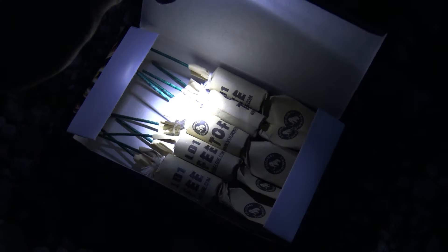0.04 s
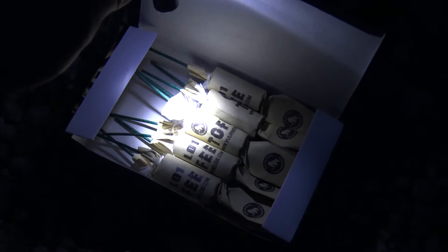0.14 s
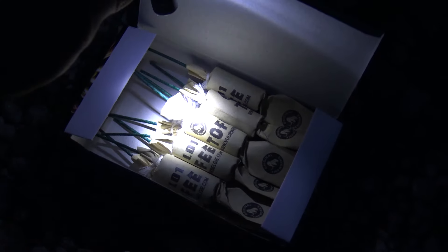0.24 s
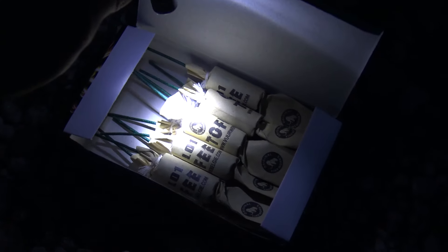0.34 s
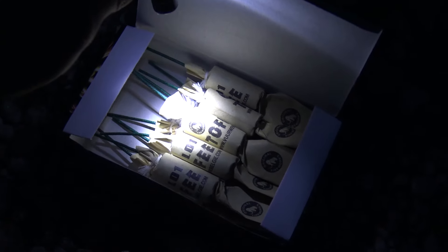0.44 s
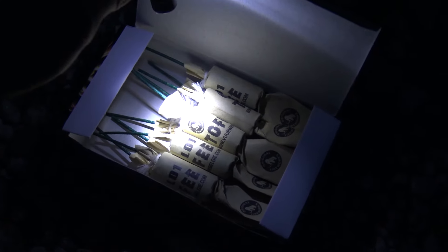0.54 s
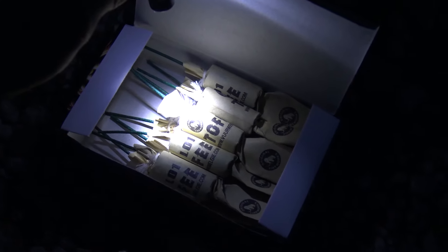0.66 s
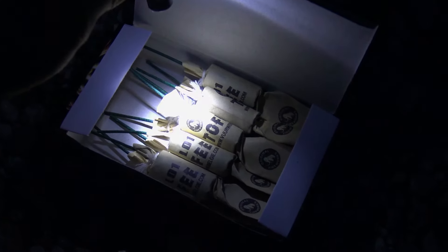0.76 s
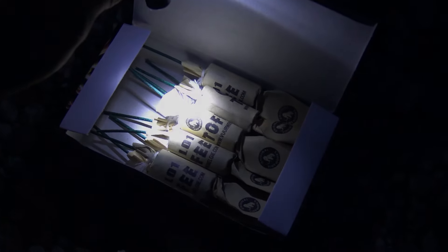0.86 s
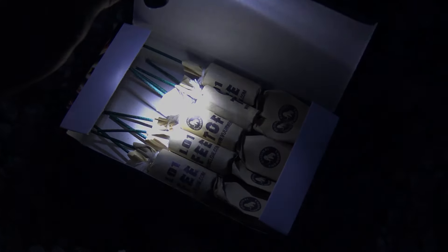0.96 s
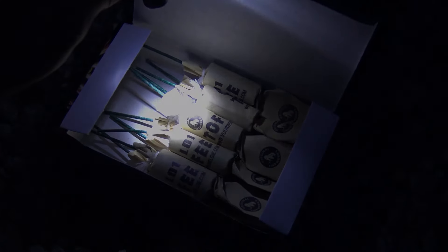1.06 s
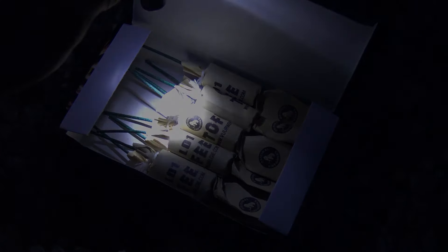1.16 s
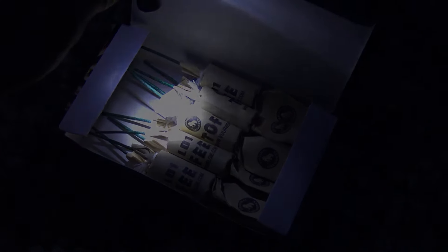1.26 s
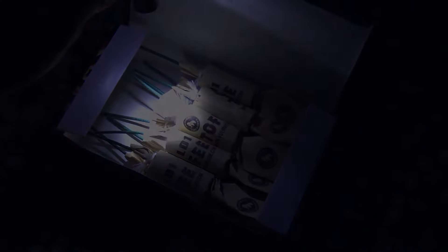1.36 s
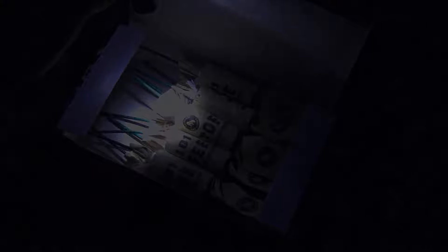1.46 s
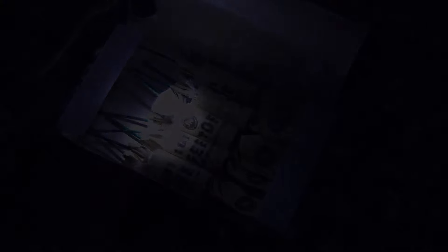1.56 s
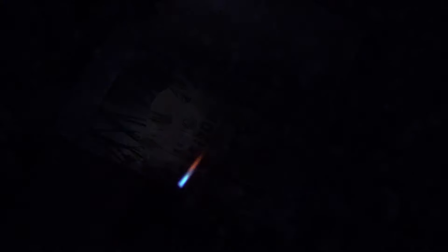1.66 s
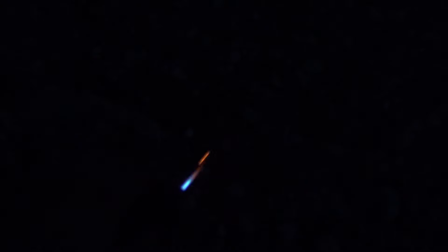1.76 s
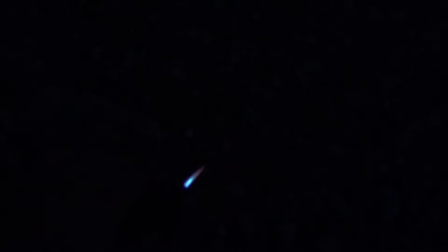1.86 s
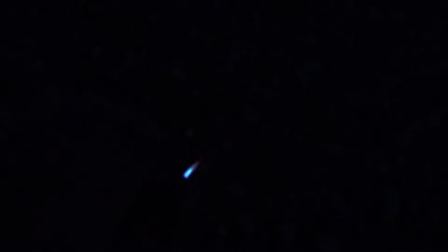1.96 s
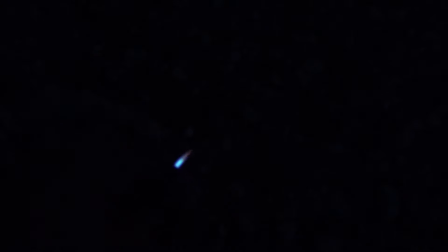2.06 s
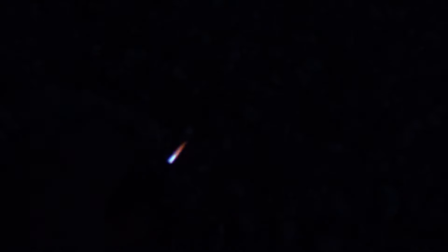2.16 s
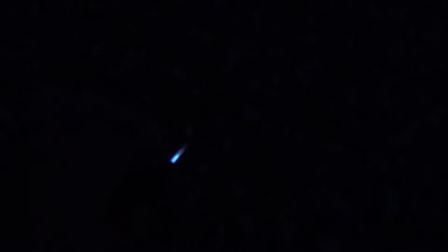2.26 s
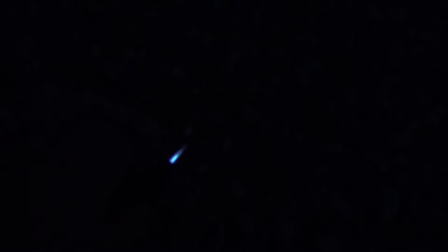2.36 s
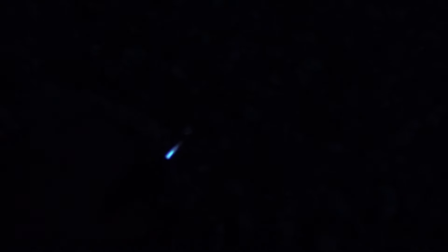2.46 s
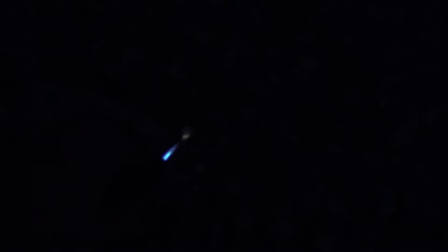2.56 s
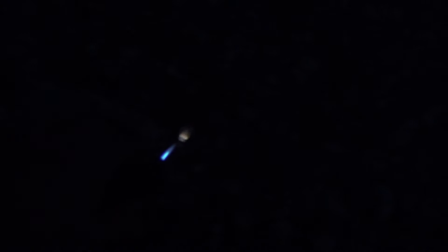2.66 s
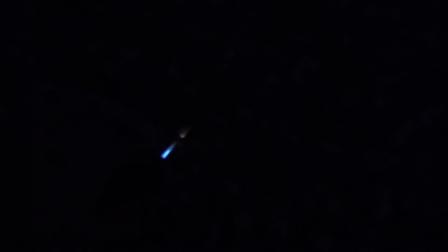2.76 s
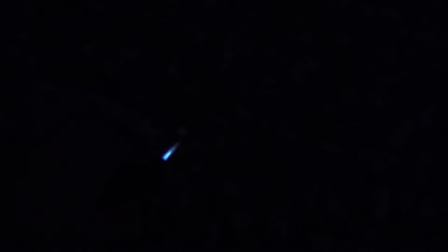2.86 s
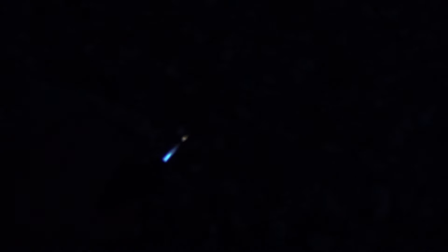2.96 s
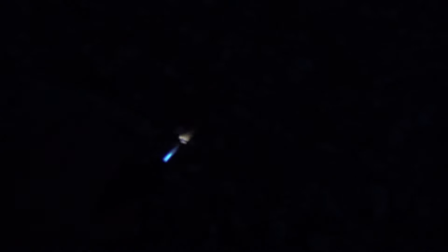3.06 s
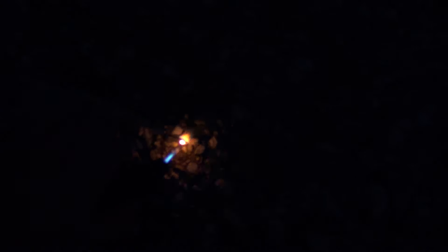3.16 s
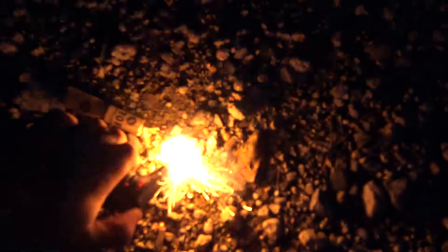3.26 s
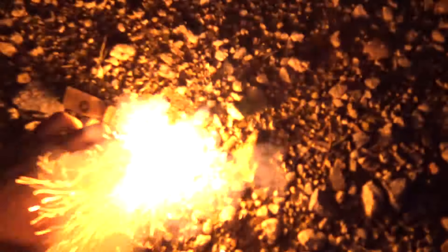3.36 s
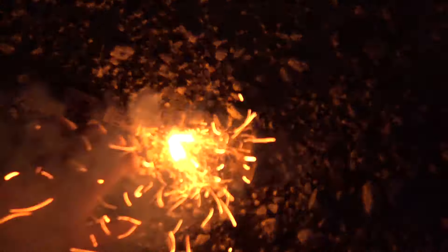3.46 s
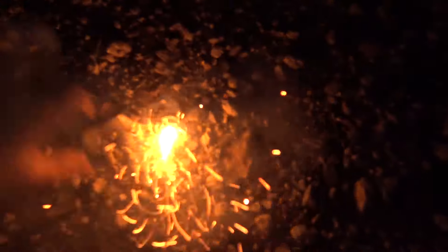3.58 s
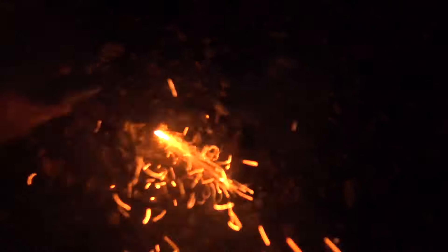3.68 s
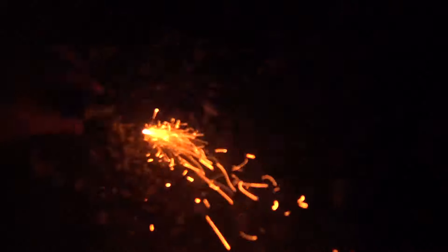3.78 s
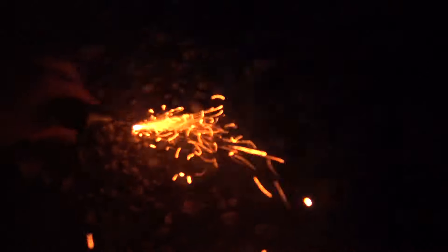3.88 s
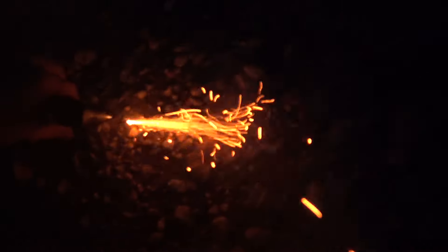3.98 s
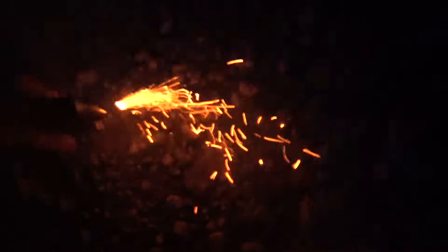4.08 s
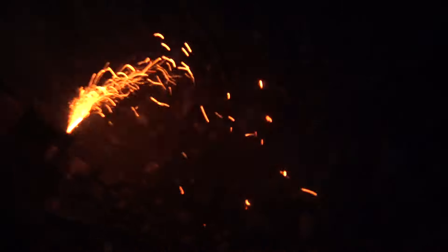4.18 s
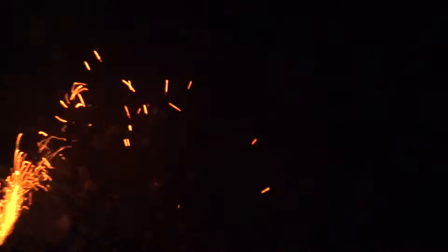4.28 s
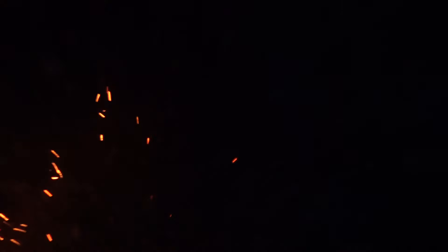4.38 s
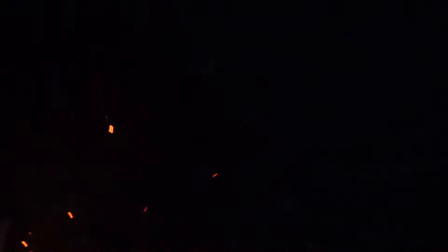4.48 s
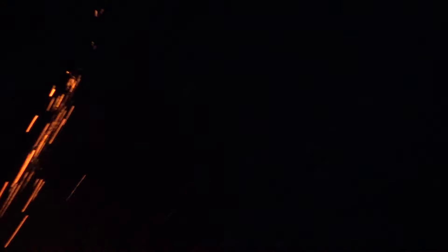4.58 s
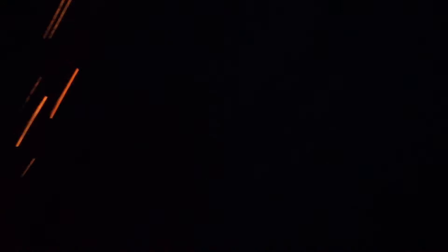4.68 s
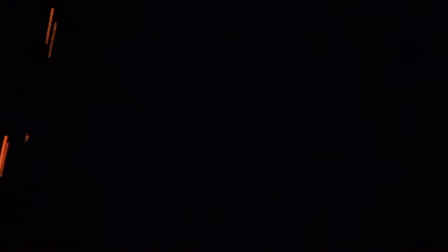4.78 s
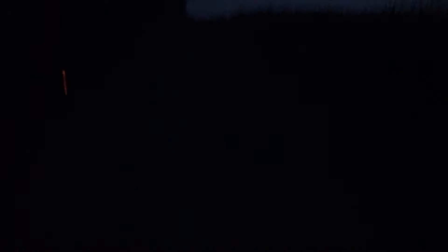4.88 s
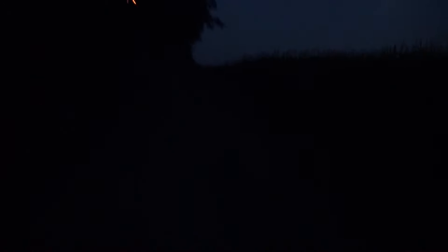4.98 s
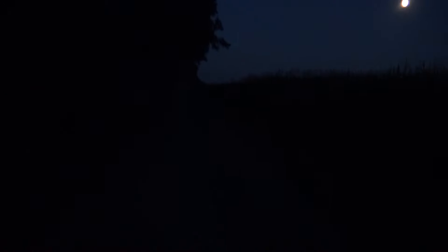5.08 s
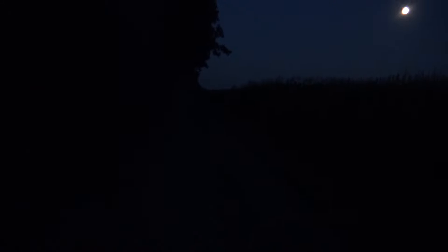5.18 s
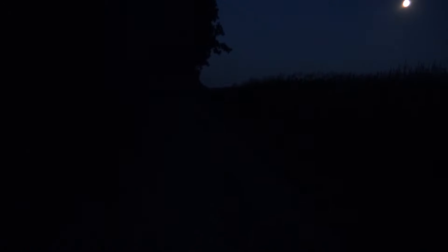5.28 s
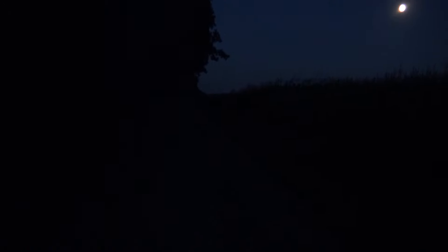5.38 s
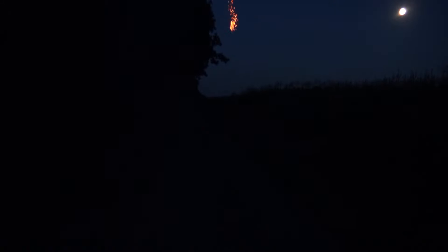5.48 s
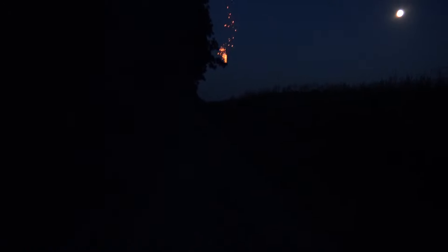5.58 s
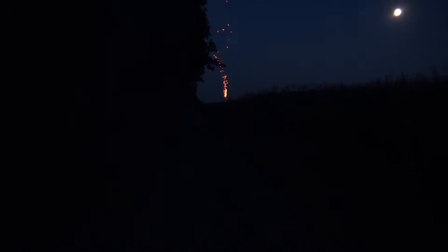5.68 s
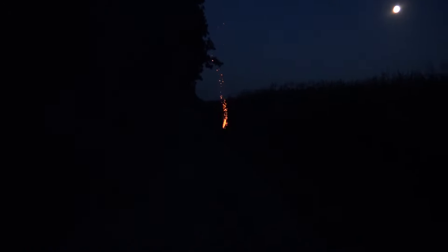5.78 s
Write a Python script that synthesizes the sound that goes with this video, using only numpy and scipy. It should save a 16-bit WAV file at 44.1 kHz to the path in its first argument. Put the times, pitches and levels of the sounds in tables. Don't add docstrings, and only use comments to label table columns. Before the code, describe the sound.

Cricket chirps and a passing far car, small plastic ticks, a sharp igniter click, soft flame, then a fierce powder hiss swept off into the distance.

```python
import sys
import numpy as np
from scipy import signal
from scipy.fft import rfft, irfft, next_fast_len
from scipy.io import wavfile
from scipy.ndimage import uniform_filter1d, map_coordinates

SR = 44100
rng = np.random.default_rng(int(sys.argv[2]) if len(sys.argv) > 2 else 0)


def voltage_ratio(decibels):
    exponent = np.asarray(decibels, float) / 20
    return 10 ** exponent


def master_out(mix):
    frames = np.transpose(np.atleast_2d(mix))
    ceiling = np.clip(frames, -1, 1)
    pcm = np.round(ceiling * 32767).astype(np.int16)
    wavfile.write(sys.argv[1], SR, pcm)


N = 257539
SIZE = next_fast_len(N)
HZ = np.maximum(np.arange(SIZE // 2 + 1) * SR / SIZE, 1)
TIME = np.arange(N) / SR

# pitch_hz, density_db (per Hz)
FIELD_TONE = [(47, -28), (80, -9), (245, 0.5), (480, -8.5), (570, -10.5), (1150, -5.5), (2700, -27),
              (6200, -39), (9400, -35.5), (17000, -37.5)]
# peak_s, level_db, fade_s
PORT_PUFFS = [
    (.85, -54.5, 0.43),
    (3.4, -52, 0.046),
    (4.0, -58, 0.22),
    (4.59, -33.5, 0.068),
    (4.7, -33, 0.048),
    (5.14, -44, 0.086),
    (5.25, -46, 0.061),
]
# start_s, level_db
CRICKET_CHIRPS = [(0.0248, -43), (0.1544, -44), (0.294, -42.5), (0.434, -42), (0.567, -41.5),
                  (0.7084, -42.5), (0.8424, -44.5), (0.9874, -45.5), (1.145, -48), (1.28, -53),
                  (1.3754, -47), (1.5084, -45), (1.9114, -43.5), (2.0472, -43.5), (2.1814, -42.5),
                  (2.3784, -44), (2.5124, -43.5), (2.6514, -45), (2.7954, -43.5), (2.9347, -44),
                  (3.0754, -43.5), (3.2196, -40.5)]
# pitch_hz, width_hz, level_db
WING_RINGS = [(9270, 610, 3), (9440, 2060, 5), (11500, 2900, -14)]
# time_s, level_db
WING_STROKES = [(0, -28), (.003, -4.5), (.022, -6.5), (.032, -9), (.05, -3), (.075, -8.5), (.1, -12.5),
                (.13, -38)]
# start_s, dull_db, bright_db, bright_hz
HAND_TICKS = [(1.1385, -44, -59, 3100), (1.1427, -36, -53, 3720), (1.1934, -57, -64, 4380),
              (1.272, -43, -50.5, 5000), (1.332, -52, -62, 5370), (1.4015, -37, -49.5, 2700),
              (1.5359, -44, -52, 3090), (1.5444, -55, -56, 3730), (1.5516, -40, -66, 3250),
              (1.6165, -50, -56, 6800), (1.9335, -53, -50, 3360)]
# start_s, dull_db, bright_db, bright_hz
POWDER_SNAPS = [
    (3.5425, -16.5, -17, 7200),
    (5.4417, -28.5, -16.5, 7430),
    (5.5278, -50, -37, 7390),
]
# start_s, level_db, pitch_hz
FOOT_STONES = [(5.071, -36, 1130), (5.078, -33.5, 982), (5.141, -33, 1640), (5.202, -34, 1614),
               (5.211, -37.5, 1560), (5.313, -34, 584), (5.324, -58, 544), (5.345, -38, 762),
               (5.361, -36, 540), (5.567, -42, 1460), (5.656, -34, 1180), (5.663, -38.5, 306),
               (5.69, -35, 1310), (5.697, -35, 1160), (5.728, -36, 647), (5.736, -43.5, 668),
               (5.784, -33, 1200), (5.795, -26.5, 1450), (5.8, -27, 1180), (5.813, -30, 850),
               (5.824, -34, 1300)]
# start_s, level_db, pitch_hz
STONE_CLACKS = [
    (4.7728, -15.5, 1360),
    (5.157, -21, 1360),
]
# lag_ms, left_gain, right_gain
NEAR_ECHOES = [(.39, 0.0053, -0.0096), (0.481, 0.14, 0.13), (.62, -0.047, -0.041), (.74, 0.019, 0.083),
               (1.15, .03, .14), (1.5, -0.028, -0.093), (1.92, 0.03, 0.014)]
# pitch_hz, density_db (per Hz)
FLAME_TONE = [(150, -26), (250, -2), (516, 0), (660, 4.5), (860, 0.5), (1200, 6), (1700, -2.5),
              (2300, -14.5), (4000, -17)]
# pitch_hz, density_db (per Hz)
JET_TONE = [(1200, -27), (2200, 11), (3600, 10), (5200, 4), (6800, 4.5), (10000, 3.5), (12300, 4.5),
            (14200, -1), (16000, 1), (17000, -2)]
# pitch_hz, level_db, t60_s
IGNITER_RINGS = [(2210, -7, 0.0081), (3520, -7.5, 0.06), (4160, -12, 0.02), (5830, 3, 0.0097),
                 (6800, 4, 0.012), (7680, -8, 0.045), (8170, 1.5, 0.012), (9550, -4.5, 0.032),
                 (10000, -4, 0.04), (10500, -3, 0.02), (11000, -7, 0.016), (11930, -4, 0.013)]
# time_s, echo_lag_ms
TORCH_DROP = [
    (1.9, 0.25),
    (2.1, 0.22),
    (2.33, .2),
    (2.45, .155),
]
# pitch_hz, density_db (per Hz)
FUSE_TONE = [(60, -17), (200, -6), (700, 0), (1200, 6), (1700, 0), (2200, 0.5), (4000, 0.5), (7000, 4),
             (10000, 5), (13000, 1.5), (16500, -4.5)]
# time_s, burn_db, aim (of its gas jet at the camera, 0-1)
FUSE_LYING = [
    (3.215, -63, 0.23),
    (3.32, -33, .28),
    (3.42, -31, 0.05),
    (3.574, -35, 0.14),
    (3.645, -29, 0.23),
    (3.71, -32, .2),
    (3.79, -27, 0.76),
    (3.92, -22, 0.91),
    (4.03, -27.5, 0.67),
]
# time_s, burn_db, aim (0-1)
FUSE_FLUNG = [
    (4.14, -23.5, 1),
    (4.316, -33, 0.67),
    (4.446, -32, .8),
    (4.55, -38, 0.78),
    (4.69, -29.5, 0.81),
    (4.77, -36, 0.76),
    (4.92, -35, 0.92),
    (5.04, -41, 0.76),
    (5.14, -39.5, 0.81),
]
# time_s, echo_lag_ms
FUSE_SWING = [
    (3.9, .114),
    (3.99, .078),
    (4.06, .088),
    (4.11, .2),
    (4.19, .44),
    (4.31, .615),
    (4.375, .65),
    (4.5, 1.1),
    (4.66, 2.8),
]

BREEZE_DB, BREEZE_WANDER_DB, FIELD_PAN_DB = -58.5, 1, 2.2
CAR_S, CAR_NEARS_DB_S, CAR_LEAVES_DB_S = 0.91, 1.5, 16.5
CAR_AIR_DB, CAR_RUMBLE_DB, DRONE_AIR_DB, DRONE_RUMBLE_DB = -50, -45, -56, -67
TICK_HZ, TICK_PAN_DB, SNAP_HZ, SNAP_PAN_DB = 1640, 3, 2500, 2
STONE_T60_S, CLACK_T60_S = 0.017, .004
VALVE_S, LEAK_DB, FLARE_DB, FLARE_S = 1.615, -53, -35.5, 0.037
IGNITER_S, IGNITER_DB = 1.6717, -6.5
FLAME_DB, FLAME_RISE_S, TORCH_AWAY_S, TORCH_AWAY_DB_S = -47.5, 0.04, 3.24, 60
JET_DB, BURST_DB, BURST_S, SETTLE_DB, SETTLE_S = -56.5, -43, 0.033, -57.5, 0.21
THROWN_FROM_M, UP_M_S, AWAY_M_S, HAND_M, CAMERA_M = 2.14, 7.1, 4.3, .69, 1.5
ROAR_DB, FIZZ_DB, SIZZLE_DB = (7.5, -14.5), (3, -11.5), (-16.5, -4.5)
FIZZ_LIFTED_DB, SIZZLE_LIFTED_DB, TUMBLE_DB = 5, -3, .9
ECHO_SHARE, ECHO_HALF_MS, ECHO_FAR, ECHO_LYING = 0.56, 3.3, 0.13, 0.52
STONE_ECHO_MS, STONE_ECHO_WANDER, STONE_ECHO_SHARE = .42, .15, .17
FUSE_PAN_DB, SWING_PAN_DB, SWING_S, SWING_WIDE_S = 2.5, 3, 4.49, 0.22
SELF_NOISE_DB = -71
SPLITS_HZ, TOP_HZ = (9200, 11200, 13600, 21000), 16650


def level(x, db):
    return x * voltage_ratio(db) / np.sqrt(np.mean(x ** 2))


def curves(rows):
    s, *columns = np.transpose(rows)
    return [np.interp(TIME, s, c) for c in columns]


def shape(x, gain):
    return irfft(rfft(x, SIZE) * gain, SIZE)[..., :N]


def colour(points):
    hz, db = np.transpose(points)
    return voltage_ratio(np.interp(np.log(HZ), np.log(hz), db))


def below(hz, order=2):
    return 1 / (1 + (HZ / hz) ** (2 * order))


def ring(hz, width_hz):
    return 1 / (1 + 1j * (HZ / hz - hz / HZ) * hz / width_hz)


def damped(hz, t60):
    t = TIME[:int(.08 * SR)]
    return np.sin(2 * np.pi * hz * t) * np.exp(-np.log(1000) * t / t60)


def walk(rate):
    k = int(SR / rate)
    held = np.repeat(rng.standard_normal(N // k + 1), k)
    return 1.28 * uniform_filter1d(uniform_filter1d(held, k), k)[:N]


def restless(x, gain, flicker_db, rate, lo_hz, hi_hz):
    bins, out = rfft(x, SIZE) * gain * (below(hi_hz) - below(lo_hz)), 0
    first, last = round(np.log2(lo_hz)), round(np.log2(hi_hz))
    pitch = np.clip(np.log2(HZ), first, last)
    for octave in range(first, last + 1):
        share = np.clip(1 - abs(pitch - octave), 0, 1)
        out = out + voltage_ratio(flicker_db * walk(rate)) * irfft(bins * share, SIZE)[..., :N]
    return level(out, 0)


def add(out, s, x):
    i = int(s * SR)
    out[..., i:i + x.shape[-1]] += x[..., :N - i]


def pan(db):
    return voltage_ratio(np.array([db, -db]) / 2).reshape(2, -1)


def twin(x, wide, hz):
    return x[0] + wide * shape(x[1], 1 - 0.75 * below(hz, order=1)) * np.array([[1], [-1]])


def delay(x, ms):
    return map_coordinates(x, [np.arange(N) - ms * SR / 1000], order=3)


def side(x, db):
    return np.array([x[0], delay(x[1], 0.0072 * db)]) * pan(db)


def bounce(x, lag_ms, share, dull_hz):
    dulled = shape(x, np.sqrt(below(dull_hz, order=1)))
    echo = np.array([delay(c, lag_ms) for c in dulled])
    return (x + share * echo) / np.sqrt(1 + share ** 2)


def nearby(x, share):
    ms, *gains = np.transpose(NEAR_ECHOES)
    turns = np.exp(-2j * np.pi * np.outer(ms / 1000, HZ))
    return x + share * shape(x, np.array(gains) @ turns)


def traffic(car_air, car_rumble):
    noise = rng.standard_normal((4, N))
    air = level(shape(twin(noise[:2], 1.0, 1900), colour(FIELD_TONE) * (1 - below(347))), 0)
    air = air * voltage_ratio(1.2 * walk(7))
    rumble = restless(twin(noise[2:], 1.0, 5000), colour(FIELD_TONE), 1.6, 11, 51, 540)
    hum = voltage_ratio(-13) * np.sin(2 * np.pi * 481 * TIME + 1.5 * walk(9))
    return air * car_air + (rumble + hum) * car_rumble


def wind(port_noise):
    puffs = level(shape(port_noise, ring(36, 40) ** 2), 0) * pan(6.5)
    strength = voltage_ratio(BREEZE_DB + BREEZE_WANDER_DB * walk(6.02))
    for s, db, fade in PORT_PUFFS:
        strength = strength + voltage_ratio(db) * np.exp(-abs(TIME - s) / fade)
    return puffs * strength * voltage_ratio(1.7 * walk(17))


def field():
    car = voltage_ratio(np.where(TIME < CAR_S, CAR_NEARS_DB_S, -CAR_LEAVES_DB_S) * (TIME - CAR_S))
    air_gain = np.hypot(car * voltage_ratio(CAR_AIR_DB), voltage_ratio(DRONE_AIR_DB))
    rumble_gain = np.hypot(car * voltage_ratio(CAR_RUMBLE_DB), voltage_ratio(DRONE_RUMBLE_DB))
    chorus_noise, rustle_noise, port_noise = rng.standard_normal((3, 2, N))
    chorus = level(shape(chorus_noise, ring(9370, 1450) ** 2), -62.5)
    chorus = chorus * np.interp(TIME, [1.6, 1.75, 1.9, 2.4], [1, .3, 0.25, 0.85])
    rustle = level(shape(rustle_noise, ring(5300, 2500) ** 2), -66.0)
    rustle = rustle * np.interp(TIME, [.04, .1, .22, .25], [0, 1, 1, 0])
    deep = level(shape(port_noise[0] + .5 * rustle_noise, ring(71.4, 29.0) ** 2), -9.5) * rumble_gain
    far = (traffic(air_gain, rumble_gain) + chorus) * pan(FIELD_PAN_DB)
    return far + rustle + deep + wind(port_noise)


def cricket():
    effort = np.zeros(N)
    stroke = voltage_ratio(np.interp(TIME[:int(.13 * SR)], *np.transpose(WING_STROKES)))
    for s, db in CRICKET_CHIRPS:
        add(effort, s, voltage_ratio(db) * stroke)
    teeth = (rng.random(N) < 700 / SR) * voltage_ratio(4.0 * rng.standard_normal(N))
    scrape = level(teeth, -9.5) + twin(rng.standard_normal((2, N)), 1.0, 3000)
    wing = sum(voltage_ratio(db) * ring(hz, width) ** 2 for hz, width, db in WING_RINGS)
    wing = wing * (1 - below(8400, order=8))
    return side(level(shape(scrape, wing), -3) * effort, 5.9)


def ticks():
    out = np.zeros((2, N))
    for rows, hz, pan_db in ((HAND_TICKS, TICK_HZ, TICK_PAN_DB), (POWDER_SNAPS, SNAP_HZ, SNAP_PAN_DB)):
        for s, db, edge_db, edge_hz in rows:
            edge = damped(edge_hz, .0025) - .6 * damped(1.55 * edge_hz, .0012)
            edge = edge + .4 * damped(.68 * edge_hz, .003) + .3 * damped(2.1 * edge_hz, .0008)
            tick = (voltage_ratio(db) * damped(hz, 0.011) + voltage_ratio(edge_db + 9.5) * edge) * pan(pan_db)
            add(out, s + 0.001, tick)
            add(out, s + .0019, -.35 * tick)
    return shape(out, ring(1300, 1700) * 1j * HZ / 1700)


def gravel():
    out = np.zeros((2, N))
    for rows, ring_s in ((FOOT_STONES, STONE_T60_S), (STONE_CLACKS, CLACK_T60_S)):
        for s, db, hz in rows:
            t60 = ring_s * (1000 / hz) ** 0.38
            knock = damped(hz, t60) + .5 * damped(1.4 * hz, 1.05 * t60)
            add(out, s + 0.00212, voltage_ratio(db) * knock * pan(3.0))
    return out


def igniter(jet):
    snap = 0
    for k, (hz, db, t60) in enumerate(IGNITER_RINGS):
        snap = snap + (-1) ** k * voltage_ratio(db) * damped(hz, min(t60, .03))
    crack = jet[:, :len(snap)] * np.exp(-(TIME[:len(snap)] / 0.0016) ** 2)
    body = 0.05 * damped(640, 0.0083) + 0.061 * damped(1700, .008)
    return voltage_ratio(IGNITER_DB) * (snap / abs(snap).max() + 0.093 * crack + body)


def torch():
    since = np.maximum(TIME - IGNITER_S, 0)
    lit = (since > 0) * voltage_ratio(-TORCH_AWAY_DB_S * np.maximum(TIME - TORCH_AWAY_S, 0))
    flame_gain = lit * voltage_ratio(FLAME_DB) * np.tanh((since / FLAME_RISE_S) ** 2)
    burst = voltage_ratio(BURST_DB) * np.exp(-since / BURST_S)
    settle = voltage_ratio(SETTLE_DB) * np.exp(-since / SETTLE_S)
    jet_gain = lit * (voltage_ratio(JET_DB) + burst + settle)
    noise = rng.standard_normal((4, N))
    flame = restless(twin(noise[:2], 0.23, 3000), colour(FLAME_TONE), 0.99, 18, 245, 2460)
    jet = level(shape(twin(noise[2:], 0.31, 3000), colour(JET_TONE)), 0)
    grounded_jet = bounce(jet * jet_gain, curves(TORCH_DROP)[0], .48, 11000)
    out = flame * flame_gain + nearby(grounded_jet, np.interp(TIME, [2.35, 2.45], [.6, 2.0]))
    valve = ring(6640, 2100) ** 2 + .7 * ring(9800, 3500) ** 2 + .25 * ring(16000, 2500) ** 2
    leak = voltage_ratio(LEAK_DB) * np.clip((TIME - VALVE_S) / 0.019, 0, 1)
    flare = voltage_ratio(FLARE_DB) * np.exp(-since / FLARE_S)
    out = out + level(shape(jet, valve), 0) * np.where(since > 0, flare, leak)
    add(out, IGNITER_S, igniter(jet))
    return side(out, 2.1)


def flight():
    t = np.maximum(TIME - FUSE_SWING[-1][0], 0)
    metres = THROWN_FROM_M + AWAY_M_S * t
    height = HAND_M + UP_M_S * t - 9.81 / 2 * t ** 2
    thrown_ms = 2000 * height * CAMERA_M / metres / 343
    return metres, np.where(t > 0, thrown_ms, curves(FUSE_SWING)[0])


def powder():
    spark_gain = voltage_ratio(np.minimum(5.9 * rng.exponential(size=N), 12))
    sparks = (rng.random(N) < 1500 / SR) * spark_gain * np.sign(rng.standard_normal(N))
    gas = rng.standard_normal((2, N)) * voltage_ratio(1.07 * walk(220) + 1.0 * walk(30))
    return twin(gas, 0.37, 3900) + level(sparks, -11.5)


def fuse():
    burn_db, aim = curves(FUSE_LYING + FUSE_FLUNG)
    metres, lag_ms = flight()
    lifted = np.interp(TIME, [3.96, 4.06], [0, 1])
    tumble = TUMBLE_DB * np.interp(TIME, [4.75, 5.0], [0, 1])
    hiss_db = burn_db - 20 * np.log10(metres / THROWN_FROM_M) + tumble * walk(26)
    roar_db, fizz_db, sizzle_db = (off + (on - off) * aim for off, on in (ROAR_DB, FIZZ_DB, SIZZLE_DB))
    fizz_db = fizz_db + FIZZ_LIFTED_DB * lifted
    sizzle_db = sizzle_db + SIZZLE_LIFTED_DB * lifted

    burn, tone = powder(), colour(FUSE_TONE)
    roar = restless(burn, tone, 1.2, 22, 70, 2000)
    fizz = restless(burn, tone, 1.1, 25, 2000, 6000)
    hiss = restless(burn, tone, 1.1, 25, 6000, 11500)
    sizzle = restless(burn, tone, 1.1, 25, 11500, 19000)
    direct = hiss + fizz * voltage_ratio(fizz_db) + roar * voltage_ratio(roar_db) + sizzle * voltage_ratio(sizzle_db)
    direct = direct * voltage_ratio(hiss_db) * (TIME > FUSE_LYING[0][0])

    share = ECHO_FAR + ECHO_SHARE / (1 + (lag_ms / ECHO_HALF_MS) ** 2)
    share = np.clip(share * np.interp(TIME, [3.75, 4.15], [ECHO_LYING, 1]), 0, 1)
    grounded = np.interp(TIME, [4.0, 4.12], [1.2, 0])
    lag_ms = lag_ms * (1 + .1 * grounded * walk(14))
    echoed = bounce(direct, lag_ms, share, 5800)
    stone_ms = STONE_ECHO_MS * (1 + STONE_ECHO_WANDER * walk(9))
    echoed = bounce(echoed, stone_ms, STONE_ECHO_SHARE * grounded, 12000)
    clutter = 0.27 * grounded * np.clip(1 + 0.49 * walk(11), 0, 2)
    pan_db = FUSE_PAN_DB + SWING_PAN_DB * np.exp(-((TIME - SWING_S) / SWING_WIDE_S) ** 2)
    return side(nearby(echoed, clutter), pan_db)


def scene():
    return field() + cricket() + ticks() + gravel() + torch() + fuse()


def shared_treble(mix):
    out = shape(mix, below(SPLITS_HZ[0], order=40))
    for lo_hz, hi_hz in zip(SPLITS_HZ, SPLITS_HZ[1:]):
        high = shape(mix, below(hi_hz, order=40) - below(lo_hz, order=40))
        common = high.mean(axis=0)
        power = uniform_filter1d(np.array([*high, common]) ** 2, size=1024) + 1e-14
        out = out + common * np.sqrt(abs(power[:2] / power[2]))
    return shape(out, below(TOP_HZ, order=150))


def roll_off(x):
    return signal.sosfilt(signal.butter(12, 17850, fs=SR, output="sos"), x)


def record(dry):
    hiss = level(shape(rng.standard_normal((2, N)), ring(4000, 9000)), SELF_NOISE_DB)
    mix = 0.57 * np.tanh((dry + hiss) / 0.64)
    return roll_off(shared_treble(mix))


dry = scene()
out = record(dry)
master_out(out)
```